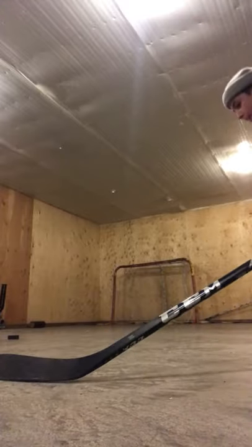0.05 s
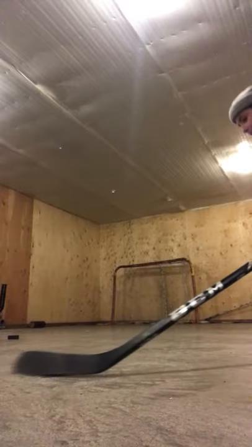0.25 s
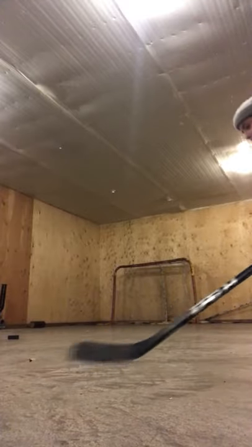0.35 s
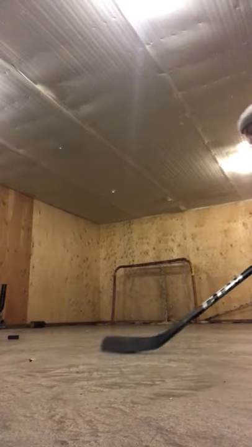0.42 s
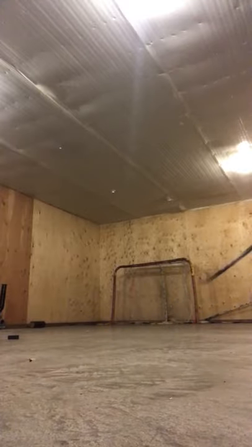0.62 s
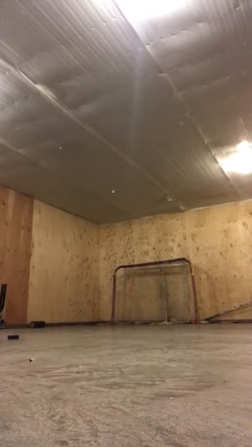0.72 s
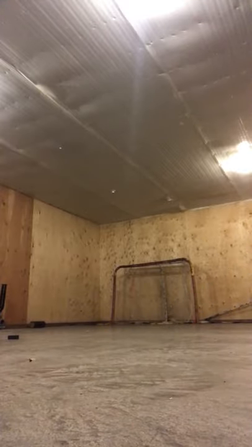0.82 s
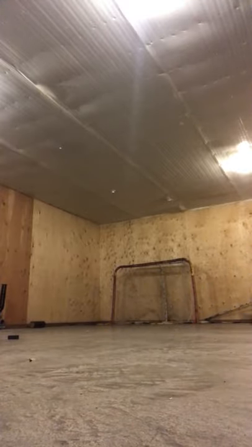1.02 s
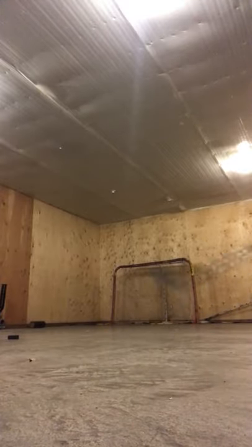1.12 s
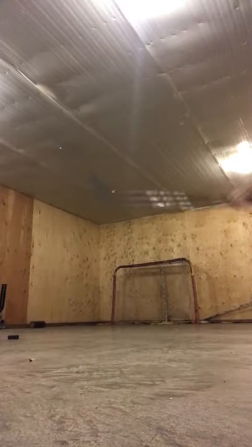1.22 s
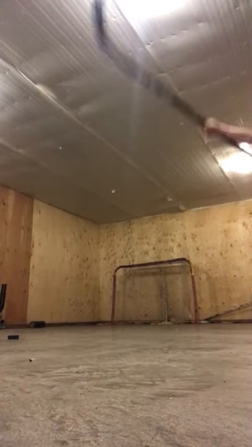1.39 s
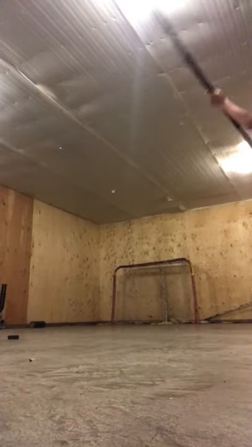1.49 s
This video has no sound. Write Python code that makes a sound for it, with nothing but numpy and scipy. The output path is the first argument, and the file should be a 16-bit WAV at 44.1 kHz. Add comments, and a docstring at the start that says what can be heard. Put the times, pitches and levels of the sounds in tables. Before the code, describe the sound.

A hockey shot in a bare, echoing room, heard close to the floor: a short gritty scrape builds to a sharp stick slap, then the puck brushes the distant net, drops against the metal goal and bounces once.

```python
"""Hockey shot on concrete

In a bare room, heard from floor level, a blade drags a puck over grit, chatters as it flexes and slaps
the floor. The puck swishes into the net, drops with a ringing knock at the goal and bounces.
A falling chirp precedes each far knock, because bending waves in the slab outrun the sound in the air."""
import sys
import numpy as np
from scipy import signal
from scipy.fft import rfft, irfft
from scipy.io import wavfile

SR = 44100
rng = np.random.default_rng(int(sys.argv[2]) if len(sys.argv) > 2 else 0)


def transcribe(signal):
    """Save signal, clipped to [-1, 1], as a 16-bit WAV file at the path in sys.argv[1]."""
    frames = np.atleast_2d(signal).T
    limited = np.clip(frames, -1, 1)
    pcm = np.round(limited * 32767).astype(np.int16)
    wavfile.write(sys.argv[1], SR, pcm)


N = 68355
T = np.arange(N) / SR


def amp(db):
    """Amplitude ratio of a level in decibels."""
    return 10 ** (np.asarray(db) / 20)


def unit(x):
    """Normalisation to rms 1."""
    return x / np.sqrt(np.mean(x ** 2) + 1e-20)


def read(points, hz):
    """Interpolation on a logarithmic frequency axis."""
    f, value = np.transpose(points)
    return np.interp(np.log(hz + 1), np.log(f + 1), value)


def convolve(x, response):
    """Output of a linear system with the given impulse response."""
    return signal.fftconvolve(x, response)[:N]


def delay(x, s):
    """Propagation delay of s seconds."""
    return np.concatenate([np.zeros(round(s * SR)), x])[:N]


def wobble(s):
    """Low-pass noise: a random drift of rms 1 on a time scale of s seconds."""
    lowpass = np.exp(-(np.fft.rfftfreq(N, 1 / SR) * s) ** 2)
    return unit(irfft(rfft(rng.standard_normal(N)) * lowpass, N))


def colour(x, spectrum, tilt_db=0, size=4096):
    """Minimum-phase filter of unit energy, tilted by tilt_db per octave above 500 Hz."""
    hz = abs(np.fft.fftfreq(size, 1 / SR))
    db = np.maximum(read(spectrum, hz), -90) + tilt_db * np.log2(np.maximum(hz, 500))
    response = np.exp(np.conj(signal.hilbert(np.log(amp(db)))))
    taps = np.fft.ifft(response).real[:size // 2]
    return convolve(x, taps / np.linalg.norm(taps))


def resonate(x, hz, width):
    """Driven damped oscillator of unit energy, whose natural frequency may glide."""
    turn = np.exp(2j * np.pi * np.cumsum(hz * np.ones(N)) / SR)
    pole = np.exp(-np.pi * width / SR)
    baseband = signal.lfilter([1], [1, -pole], x / turn + 1e-18)
    return np.sqrt(2 * (1 - pole * pole)) * (turn * baseband).real


def envelope(start, decay, rise):
    """Linear rise and exponential decay."""
    age = np.maximum(T - start, 0)
    return np.minimum(age / rise, 1) * np.exp(-np.maximum(age - rise, 0) / decay)


def burst(start, db, decay, rise=0.00021):
    """Broadband excitation by a dying shower of tiny contacts."""
    shape = envelope(start, decay, rise)
    x = shape * rng.choice([-1., 1.], N)
    first = int(np.argmax(shape > 0))
    onset = slice(first, first + 4096)
    bound = shape[onset]
    for _ in range(6):  # flatten the spectrum, then confine to twice the envelope
        flat = irfft(np.exp(1j * np.angle(rfft(x[onset], 8192))))[:len(bound)]
        x[onset] = np.clip(flat * np.linalg.norm(bound), -2 * bound, 2 * bound)
    return amp(db) * x


# reverberation time of the room (frequency [Hz], T60 [s])
REVERB_TIMES = [(60, 0.96), (250, 0.68), (700, 0.77), (1500, 0.81), (3000, 0.46), (6000, 0.45),
                (10000, 0.31), (16000, 0.32)]

def room(x, db, build_s=0.011):
    """Reverberation: a diffuse field builds up, then decays fastest in the treble."""
    flat = irfft(np.exp(2j * np.pi * rng.random(4097)))
    noise = np.concatenate([unit(flat), rng.standard_normal(N)])
    hz, t, bands = signal.stft(noise, SR, nperseg=256)
    decay = amp(-60 * t / read(REVERB_TIMES, hz)[:, None])
    tail = signal.istft(bands * decay, SR, nperseg=256)[1][:N] * np.minimum(T / build_s, 1)
    return amp(db) * convolve(x, tail / np.linalg.norm(tail))


# room air (frequency [Hz], relative level [dB])
AIR_SPECTRUM = [(15, -32.5), (25, -15.5), (128, -1.5), (186, -8), (250, -14.5), (318, -7), (655, -16.5),
                (1390, -12), (1630, -19), (1910, -16.5), (4620, -34.5), (5280, -33.5), (15000, -45)]
# mains hum (frequency [Hz], rms level [dB])
HUM_PARTIALS = [(60, -51.5), (119.7, -50), (239, -57.5)]

def background():
    """Ambient noise: the line spectrum of mains hum over the continuous spectrum of room air."""
    hum = sum(amp(db) * np.sqrt(2) * np.sin(2 * np.pi * (hz * T + rng.random()))
              for hz, db in HUM_PARTIALS)
    gain = amp(read(AIR_SPECTRUM, np.fft.rfftfreq(N, 1 / SR)))
    air = irfft(rfft(rng.standard_normal(N)) * gain, N)
    return hum + amp(-49) * unit(air)


# puck brushing the net (time [s], relative level [dB], rise [s], decay [s])
NET_BRUSHES = [(0.776, -47.5, 0.08, 0.026), (0.846, -27, 0.0093, 0.034), (1.07, -36, 0.0051, 0.0054),
               (1.126, -46, 0.024, 0.049)]
# mesh (frequency [Hz], relative level [dB])
NET_SPECTRUM = [(88, -32), (150, 1.5), (273, -11), (612, -5.5), (818, -14.5), (900, -8.5), (1870, -7),
                (2650, -10), (5610, -11.5), (15000, -29.5)]

def net():
    """Friction noise: the mesh swishes as the puck brushes it."""
    rubbing = sum(burst(s, db, decay, rise) for s, db, rise, decay in NET_BRUSHES)
    swish = colour(rubbing, NET_SPECTRUM)
    return amp(-2.5) * swish + room(swish, -2.5, build_s=0.0078)


# dull thuds of the goal (time [s], level [dB], frequency [Hz], decay [s])
GOAL_THUDS = [(0.854, -43, 159, 0.03), (0.884, -35.5, 88.7, 0.052), (0.983, -30.5, 79.5, 0.014),
              (1.177, -26.5, 143, 0.013), (1.205, -26, 92.8, 0.031), (1.269, -38.5, 70, 0.051),
              (1.275, -38.5, 195, 0.018)]

def goal_thuds():
    """Damped low-frequency vibration of the goal as it stops the puck."""
    thuds = sum(amp(db) * envelope(s, decay, rise=0.0089) * np.sin(2 * np.pi * hz * (T - s))
                for s, db, hz, decay in GOAL_THUDS)
    return thuds + room(thuds, -10)


def slab_chirp(arrival):
    """Dispersion: bending waves in the concrete outrun the airborne sound, high frequencies first."""
    air_travel_s, coincidence_hz = 0.0198, 94.3  # at coincidence both waves arrive together
    age = np.maximum(T - arrival + air_travel_s, 1 / SR)
    hz = coincidence_hz * (air_travel_s / age) ** 2
    db = read([(60, -42), (130, -7), (300, -3.5), (650, 1), (1300, -19), (3000, -23), (6000, -90)], hz)
    phase = 2 * np.pi * hz * age + 0.54 * wobble(0.00091)  # jitter roughens the sweep
    return amp(db) * np.sin(phase) * (hz < SR / 4) * (age < 2 * air_travel_s)


# modes of the goal frame (frequency [Hz], relative level [dB], T60 [s])
FRAME_MODES = [(527, -6.5, 0.37), (1034, -13, 0.63), (1938, 2, 0.37), (1968, 4.5, 0.23), (2230, -12, 0.17),
               (2300, 1, 0.22), (3150, -8, 0.16), (4300, -3, 0.26)]

def frame_ring(start):
    """Free vibration: after a blow, each mode of the frame decays exponentially."""
    age = np.maximum(T - start, 0)
    return sum(amp(db - 60 * age / t60) * np.sin(2 * np.pi * hz * age) for hz, db, t60 in FRAME_MODES)


# puck landing at the goal (time [s], knock gain [dB], frame gain [dB], slab gain [dB])
LANDINGS = [(1.1838, -17, 0.5, 4), (1.5455, -19.5, -7.5, -1)]
# knock (frequency [Hz], relative level [dB])
KNOCK_SPECTRUM = [(30, -23), (100, -9), (190, -7), (320, -13), (550, -7), (900, -12), (1650, -8), (1950, 1),
                  (2400, -7.5), (3100, -8.5), (4400, -14.5), (5200, -20.5), (8500, -34.5), (15000, -36.5)]
# reflections from the far corner (delay [s], gain [dB])
FAR_REFLECTIONS = [(.005, 5.5), (.0075, 5), (.0155, 2.5), (0.0193, 2.5), (.029, -2.5)]

def knocks():
    """Impact excitation: each landing echoes from the corner and sets frame and slab vibrating."""
    paths = [(0.0029, 0)] + FAR_REFLECTIONS
    hits, vibration = np.zeros(N), np.zeros(N)
    for s, db, frame_db, slab_db in LANDINGS:
        blows = sum(burst(s + late, db + path_db, 0.003, rise=0.0016) for late, path_db in paths)
        hits += colour(blows, KNOCK_SPECTRUM)
        vibration += amp(frame_db) * frame_ring(s) + amp(slab_db) * slab_chirp(s)
    return hits + room(hits, -6, build_s=0.013) + amp(-26) * vibration


# drag of the blade (time [s], level [dB])
DRAG_LEVELS = [(0.03, -79), (0.1, -57), (0.15, -43.5), (0.2, -38.5), (0.245, -28.5), (0.29, -26.5),
               (0.32, -22), (0.37, -23), (0.405, -31.5), (0.425, -52), (0.46, -32), (0.5, -33.5),
               (0.53, -65)]
# crushed grit (frequency [Hz], relative level [dB])
GRIT_SPECTRUM = [(120, -35), (200, -1), (227, -37), (283, -13.5), (379, -35), (438, -15), (631, -14),
                 (1050, -13.5), (2860, 1.5), (3140, -4.5), (3500, 2.5), (5220, -7.5), (5620, 1), (7520, -6),
                 (11400, -3.5), (15600, -22)]
# blade catching on grit (time [s], level [dB], decay [s], tilt [dB/octave])
GRIT_CATCHES = [(0.1578, -20, 0.0013, 7), (0.3105, -18.5, 0.0038, 12.5), (0.3204, -9.5, .0028, 0.5),
                (0.3245, -14.5, 0.0022, 6.5), (0.347, -19, 0.0012, -0.5), (0.3753, -15.5, 0.001, -3),
                (0.4015, -15.5, .003, -3), (0.7495, -29, 0.0034, -7)]
# blade skidding (time [s], level [dB], decay [s])
BLADE_SKIDS = [(0.4014, -15, .005)]

def drag():
    """Stick-slip friction: the blade crushes grit, catches on it and skids with a thin squeak."""
    grains_per_s, spread_db, judder_db = 4500, 3.5, 2
    sizes = amp(spread_db * np.minimum(rng.exponential(1, N), 4) + judder_db * wobble(0.0018))
    grains = unit(sizes * rng.choice([-1., 1.], N) * (rng.random(N) < grains_per_s / SR))
    level = np.interp(T, *np.transpose(DRAG_LEVELS), right=-120)
    scrape = colour(grains * amp(level), GRIT_SPECTRUM)
    rubbing = burst(0.1504, -34.5, 0.22, rise=0.025) * (T < FLOOR_SLAPS[0][0])  # ends at the slap
    slide = colour(rubbing, [(60, -26.5), (190, -3), (300, -8), (800, -5), (1450, 1), (2600, -2),
                             (5000, -16), (15000, -41)])
    catches = sum(colour(burst(s, db, decay), GRIT_SPECTRUM, tilt)
                  for s, db, decay, tilt in GRIT_CATCHES)
    squeak = resonate(sum(burst(*skid) for skid in BLADE_SKIDS), hz=7080, width=530)
    sustained, sharp = scrape + slide, catches + squeak
    return sustained + sharp + room(sustained, -5.5) + room(sharp, -4.5)


# stick modes (frequency [Hz], bandwidth [Hz], gain in the chatter [dB], gain in the slap [dB])
STICK_MODES = [(433, 31, -26, -1.5), (885, 126, -10.5, -1.5), (1353, 82, -5, 3.5), (1781, 38, 3, -8),
               (2124, 110, -4.5, -1), (3034, 67, -4.5, 0), (4130, 400, -13, -9)]

def stick(drive, slapped, tuning=1):
    """Modal superposition: chatter and slap excite the same modes in different proportions."""
    return sum(amp(slap_db if slapped else chatter_db) * resonate(drive, hz * tuning, width)
               for hz, width, chatter_db, slap_db in STICK_MODES)


# puck striking along the blade (time [s], relative level [dB], decay [s])
CHATTER_CONTACTS = [(0.395, -18.5, 0.0078), (0.4031, -13.5, 0.012), (0.4215, -11.5, 0.0073),
                    (0.429, -12.5, 0.0106), (0.441, -19, 0.0084), (0.447, -13.5, 0.0042)]
# contact noise (frequency [Hz], relative level [dB])
CHATTER_SPECTRUM = [(100, -38), (600, -21.5), (880, 4.5), (1400, 3.5), (2100, 2), (2500, -7), (4000, 0.5),
                    (5000, -5.5), (7000, -12), (15000, -48)]

def chatter():
    """Forced vibration: the puck judders along the blade, whose resonances sink as it flexes."""
    drive = sum(burst(s, db, decay, rise=0.0016) for s, db, decay in CHATTER_CONTACTS)
    sink_per_s, mid_flex_s = 1.74, 0.425
    tuning = 1 - sink_per_s * np.clip(T - mid_flex_s, -0.05, 0.05)
    body = stick(drive, slapped=False, tuning=tuning)
    direct = amp(-8.5) * body + amp(-7) * colour(drive, CHATTER_SPECTRUM)
    return direct + room(direct, -8, build_s=0.049)


# hollow tone (peak time [s], level [dB], frequency [Hz], time constant [s])
HOLLOW_SWELLS = [(0.696, -34.5, 339, 0.0099)]

def hollow_tone():
    """Tone pulse with a sech envelope: a hollow note swells in the room after the slap."""
    return sum(amp(db) / np.cosh(np.minimum(abs(T - s) / tau, 20)) * np.sin(2 * np.pi * hz * T)
               for s, db, hz, tau in HOLLOW_SWELLS)


# blade striking the floor (time [s], level [dB], decay [s])
FLOOR_SLAPS = [(0.4655, -3, 0.002), (0.469, -7, 0.0014), (0.4747, -14, 0.0026)]
# slap (frequency [Hz], relative level [dB])
SLAP_SPECTRUM = [(30, -32), (160, -22), (235, -3.5), (280, -3.5), (345, -7), (420, 1), (480, 1),
                 (570, -5.5), (800, 1.5), (1100, -3.5), (2500, -0.5), (4200, -3.5), (5100, -16),
                 (6500, -8.5), (10000, -25.5), (15000, -43.5)]
# reflections from nearby walls and ceiling (delay [s], gain [dB])
NEAR_REFLECTIONS = [(0.0159, -11), (.034, -15.5), (.042, -12.5), (.048, -16), (.058, -31), (.117, -51)]

def slap():
    """Impulsive excitation: the blade cracks on the floor, the stick rings and reflections follow."""
    drive = sum(burst(*blow) for blow in FLOOR_SLAPS)
    crack = colour(drive, SLAP_SPECTRUM) + amp(-10.5) * stick(drive, slapped=True)
    echoes = sum(amp(db) * delay(crack, s) for s, db in NEAR_REFLECTIONS)
    return crack + echoes + room(crack, -6.2, build_s=0.033)


def scene():
    """Superposition: the pressures of all sources add at one microphone."""
    shot = drag() + chatter() + slap() + hollow_tone()
    goal = net() + goal_thuds() + knocks()
    return (shot + goal + background())[None]


def record(dry):
    """Band limiting and saturation: the microphone sheds deep bass, rounds peaks and cuts top treble."""
    low_cut_hz, high_cut_hz, ceiling = 42, 15750, 0.95
    thin = signal.sosfilt(signal.butter(4, low_cut_hz, "highpass", fs=SR, output="sos"), dry)
    saturated = thin / (1 + (thin / ceiling) ** 6) ** (1 / 6)
    lowpass = signal.firwin(511, high_cut_hz, window=("kaiser", 9), fs=SR)
    return signal.oaconvolve(0.95 * saturated, lowpass[None], "same")


dry = scene()
out = record(dry)
transcribe(out)
```